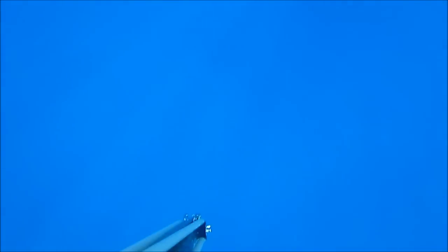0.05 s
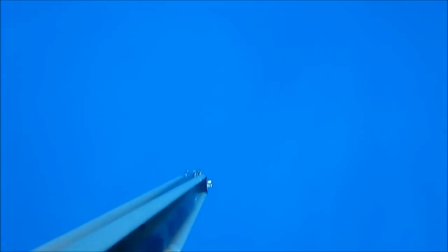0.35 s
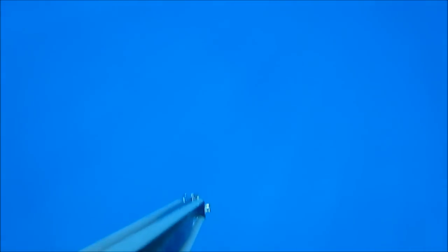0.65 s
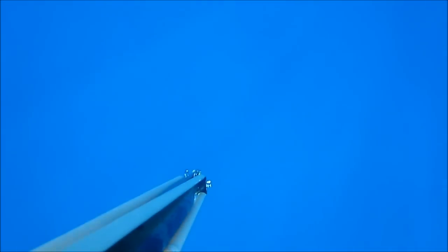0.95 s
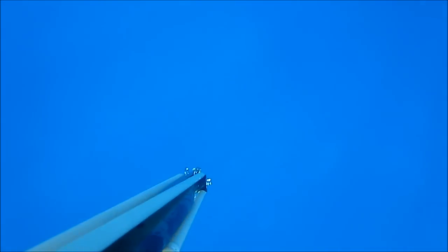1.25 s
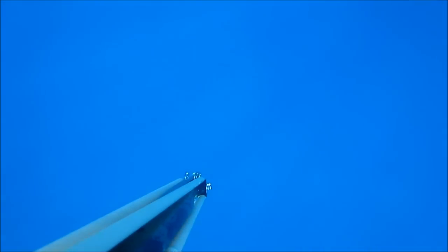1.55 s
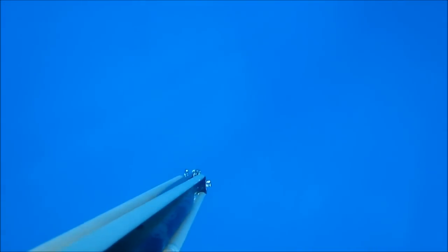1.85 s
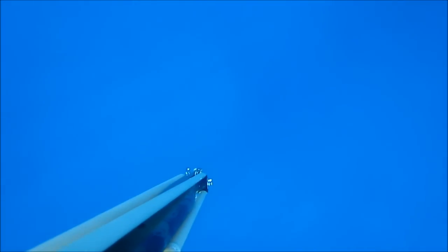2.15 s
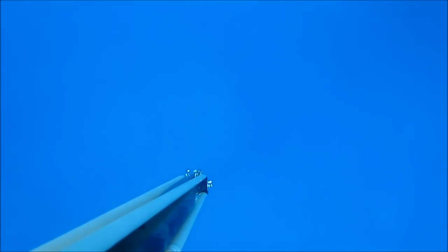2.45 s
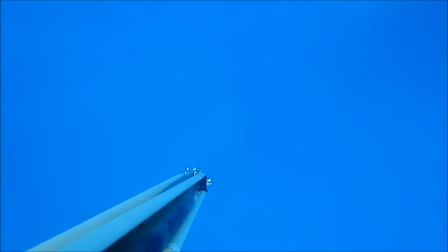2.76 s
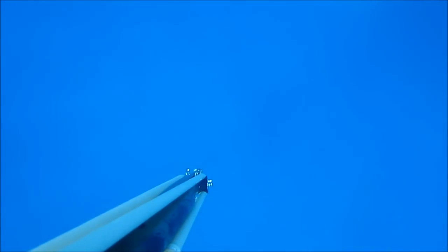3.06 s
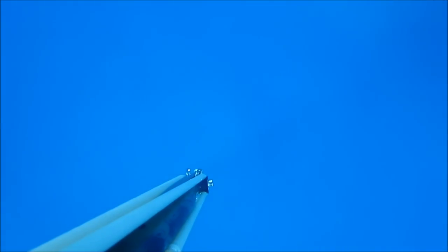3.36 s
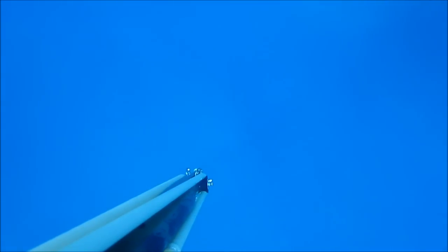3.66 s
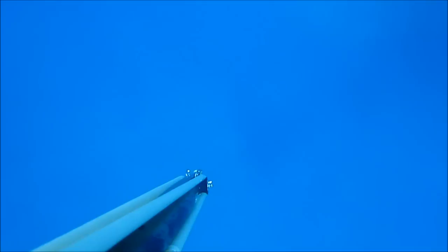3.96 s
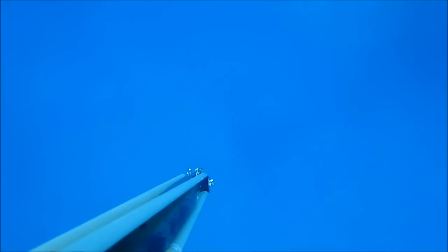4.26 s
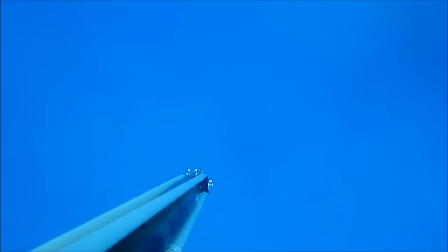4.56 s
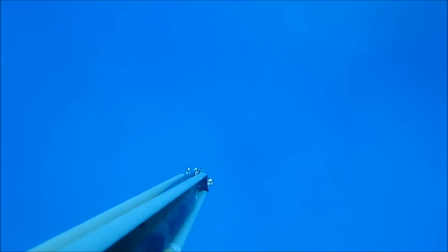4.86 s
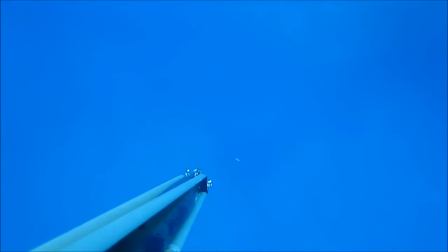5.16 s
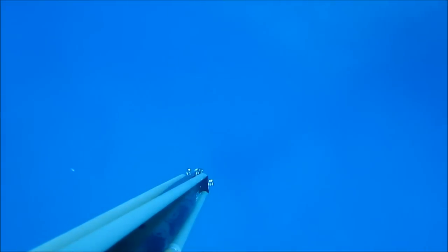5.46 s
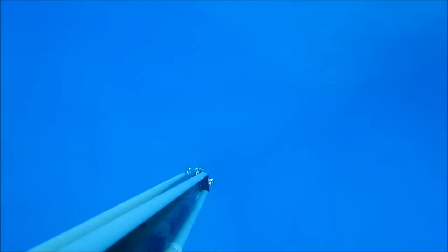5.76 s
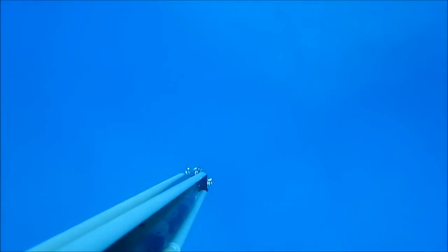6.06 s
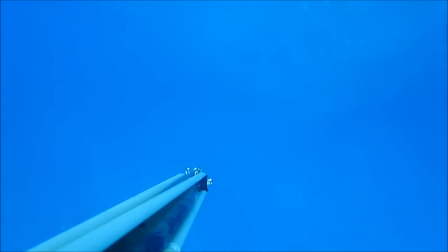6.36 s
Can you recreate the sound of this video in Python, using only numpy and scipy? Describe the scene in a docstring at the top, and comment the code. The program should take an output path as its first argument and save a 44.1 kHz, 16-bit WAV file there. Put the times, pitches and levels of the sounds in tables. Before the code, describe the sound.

A quick rattle of hard, briefly ringing clacks opens this underwater sound, picked up from inside a camera housing. Short gurgles of air follow, then a few soft, dull thuds from handling the pole. What remains is quiet sea ambience that runs all along: irregular bright shrimp snaps, fine distant crackle, muffled sloshing, an even hiss and the faint high whine of the camera's electronics.

```python
"""A camera in a waterproof housing is held under the sea on a pole.
First, gear knocks on the housing and makes it ring, and pockets of air gurgle as it is moved into place.
From about one second, the grip bumps softly on the pole while the rumble of the water settles.
What remains was there all along: shrimp snapping as their bubbles collapse, heard through the housing,
a muffled wash of water, a steady hiss and the thin whine of the camera's electronics."""
import sys
import numpy as np
from scipy import signal
from scipy.fft import rfft, irfft
from scipy.io import wavfile

SR = 44100
rng = np.random.default_rng(int(sys.argv[2]) if len(sys.argv) > 2 else 0)


def store_pcm(level_fs):
    """Save levels as 16-bit WAV."""
    pcm = np.round(np.clip(level_fs, -1, 1) * 32767).astype(np.int16)
    wavfile.write(sys.argv[1], SR, np.atleast_2d(pcm).T)


N = 286650
TIME = np.arange(N) / SR

# Gear knocking on the housing. Each row: start in seconds, clack level in dB, clack pitch in Hz,
# ring time in seconds (the time to fade by 60 dB), body level in dB, tick level in dB, tick pitch in Hz.
GEAR_KNOCKS = [(0.016, -6.5, 2010, 0.006, -3.5, -32, 4500), (0.0260, -10.5, 2790, 0.026, -16.5, -24, 9000),
               (0.0274, -4, 1930, 0.012, -10, -36, 4500), (0.0372, -11.5, 1940, 0.0076, -34, -39, 4480),
               (0.116, -27, 3380, .014, -28, -29, 6000), (0.1197, -20.5, 2790, .018, -30, -23, 4200),
               (0.1297, -3, 2620, 0.0036, -19, -18.5, 7820), (0.148, -15, 2770, 0.017, -43, -21, 5600),
               (0.1639, -18.5, 4810, 0.016, -19, -19.5, 5550), (0.1665, -13, 3050, 0.008, -28, -32, 3870),
               (0.1731, -0.5, 3180, 0.0059, -9, -29, 9500), (0.2140, -23.5, 3270, .015, -37, -22.5, 5300),
               (0.6095, -15, 2830, .003, -20.5, -22, 4370), (0.6910, -29, 3000, 0.012, -48, -27, 3760)]
# Notes of the housing's hollow body. Each row: pitch in Hz, relative level in dB, ring time in seconds.
BODY_NOTES = [(592, -2.5, 0.038), (800, 20.5, 0.014), (913, 4, 0.029), (1440, 11.5, 0.017)]
# Notes of its stiff walls. Each row: pitch in Hz, relative level in dB, ring time in seconds.
WALL_NOTES = [(2720, -5, 0.016), (3433, 2.5, 0.011), (4254, -4.5, 0.012), (4664, -6.5, 0.013),
              (4980, -6.5, 0.017), (6000, -10.5, 0.017), (7430, -4.5, 0.0057), (7500, -6, .007),
              (8970, -1, 0.0093), (10200, -5, 0.0032), (11600, -0.5, 0.0041), (13200, -25, .003),
              (14400, -33, .003)]
# Gurgling pockets of air. Each row: start in seconds, length in seconds, pitch in Hz, slide in octaves,
# level of the main note in dB, level of the upper note in dB.
AIR_POCKETS = [(0.098, 0.057, 525, 0.19, -24, -50), (0.252, 0.049, 96, 0, -35, -52),
               (0.404, 0.02, 500, -0.33, -25, -38), (0.489, 0.06, 380.6, -.1, -28, -25.5),
               (0.509, 0.13, 310.6, -0.19, -30, -37), (0.502, 0.12, 67, .2, -38, -52),
               (0.636, 0.15, 80, -0.055, -32.5, -63), (0.857, 0.074, 105, 0.067, -35, -40),
               (0.93, 0.097, 131, 0.39, -24.5, -27), (1.043, 0.016, 560, 0.056, -21.5, -38),
               (1.352, 0.076, 381, 0.07, -30.5, -28.5), (4.250, 0.024, 135, -.1, -36, -49)]
# Bumps of the grip on the pole. Each row: start in seconds, peak level in dB.
GRIP_BUMPS = [(0.937, -21.5), (0.956, -33), (1.043, -19), (1.386, -31), (1.737, -19), (1.815, -27),
              (2.158, -32), (2.509, -30), (2.597, -23), (3.181, -30.5), (3.316, -32)]
# Snaps of the closest shrimp. Each row: start in seconds, peak level in dB, centre pitch in Hz.
CLOSE_SNAPS = [(0.487, -28.5, 9000), (1.113, -37, 4730), (1.462, -30.5, 4980), (1.6427, -34, 4840),
               (1.8387, -31, 4180), (2.3745, -32, 4300), (2.718, -29, 7700), (3.113, -27.5, 4850),
               (3.4865, -30, 4750), (3.6122, -26.5, 4180), (4.1694, -33, 4170), (4.3251, -32.5, 4800),
               (4.5236, -32, 4290), (5.0148, -29.5, 4230), (5.0713, -26, 4350), (5.2525, -28.5, 5960),
               (5.279, -27, 4270), (5.664, -27, 6040), (5.8824, -35, 5010), (6.2143, -29, 4170),
               (6.3842, -28, 4380), (6.484, -24, 5750)]
# The tone colour of four noises. Each row: frequency in Hz, relative level in dB.
RUMBLE_SPECTRUM = [(10, -1), (25, -7.5), (60, -2), (130, -6.5), (220, -6), (350, -4)]
SLOSH_SPECTRUM = [(150, -42), (250, -9), (350, 0.5), (450, 3.5), (520, 1.5), (700, -17.5)]
SPLASH_SPECTRUM = [(450, -2.5), (620, 4), (740, 1), (820, -0.5), (910, 2.5), (1050, -5.5), (1350, -17),
                   (2000, -4.5)]
HISS_SPECTRUM = [(500, -24), (1200, 4.5), (1380, 2.5), (1850, 6), (2300, 1.5), (3100, -0.5), (5400, -3),
                 (6500, -8.5), (8200, -6.5), (9000, -1.5), (10200, -5.5), (10700, -17), (13200, -11),
                 (15700, -16)]
# How the low sloshing, the lighter splashing and the housing's hollow note rise and fall.
# Each row: time in seconds, relative level in dB.
SLOSH_CURVE = [(0.2, -44.5), (0.85, -40), (1.41, -44), (2.52, -40), (3.65, -44), (4.18, -42.5),
               (4.45, -46.5), (5.41, -48), (6.32, -44.5), (6.5, -47)]
SPLASH_CURVE = [(0.2, -44), (0.79, -45.5), (2.1, -49), (2.55, -47.5), (3.48, -47), (4.23, -49.5),
                (4.67, -48.5), (4.94, -50), (5.69, -50.5), (6.5, -51)]
HOLLOW_CURVE = [(1.45, -44.5), (2.35, -44.5), (3.04, -52), (3.45, -47), (4.07, -48), (4.39, -45.5),
                (5.58, -44), (6.5, -47.5)]
# Tones of the electronics. Each row: pitch in Hz, average (rms) level in dB.
WHINE_TONES = [(1591.7, -64.5), (1878.7, -46), (2165.8, -57), (2740, -61.5), (3534.6, -61.5), (4763, -62.5),
               (5557.8, -64.5), (7580, -69), (7867, -80), (8442, -89), (8729, -77), (9028, -89),
               (9316, -89), (9603, -77), (9889.4, -66.5), (10176.5, -66.5), (11259, -81), (11546, -84),
               (14133, -87), (14420, -79), (14707, -79)]


def gear_knocks():
    """Each knock clacks at its own pitch, rings the hollow body and adds a short, high tick."""
    out = np.zeros(N)
    for start, clack_db, hz, ring_s, body_db, tick_db, tick_hz in GEAR_KNOCKS:
        blow = impulse(scatter=0.73, spread_s=0.003)
        clack = cut(ring(blow, hz, ring_s), 1.24 * hz, "low", order=6)
        clack = cut(clack, 0.62 * hz, "high")
        body = sum(from_db(db) * ring(blow, note_hz, fade_s) for note_hz, db, fade_s in BODY_NOTES)
        body = cut(body, 2070, "low", order=4)
        tick = cut(ring(blow, tick_hz, ring_s=0.0042), 2.3 * tick_hz, "low")
        add(out, start, at_peak(clack, clack_db) + at_peak(body, body_db) + at_peak(tick, tick_db))
    return out


def gurgles(wobble=0.041, roughness=0.35):
    """An air pocket swells, slides in pitch as it changes size, and fades; an upper note rings along."""
    out, unrest, flutter = np.zeros(N), drift(42), drift(86)
    for start, length, pitch_hz, slide, main_db, upper_db in AIR_POCKETS:
        age = np.linspace(0, 1, int(length * SR))
        here = slice(int(start * SR), int(start * SR) + len(age))
        swell = np.sin(np.pi * age ** 0.59) * (1 + roughness * flutter[here])
        main_hz = pitch_hz * 2 ** (slide * (age - .5))
        upper_hz = 1.28 * pitch_hz + 66.8
        for hz, db in ((main_hz, main_db), (upper_hz, upper_db)):
            phase = 2 * np.pi * np.cumsum(hz * (1 + wobble * unrest[here])) / SR
            add(out, start, from_db(db) * swell * np.sin(phase))
    return out


def grip_bumps():
    """A soft push on the pole gives one low thud and a short hollow ring."""
    out = np.zeros(N)
    for start, db in GRIP_BUMPS:
        push = impulse(scatter=0.3, spread_s=0.011)
        thud = ring(push, 39, 0.062) + 0.51 * ring(push, 89, 0.019) + ring(push, 490, 0.02)
        add(out, start, at_peak(cut(thud, 850, "low"), db))
    return out


def shrimp_snaps(width_octaves=0.22, through_gain=0.51):
    """A close shrimp's bubble collapses; the pop passes through the walls and makes them ring."""
    out = np.zeros(N)
    for start, db, centre_hz in list(CLOSE_SNAPS) + neighbour_snaps():
        pop = impulse(scatter=2.0, spread_s=0.0024)   # smeared by echoes off seabed and surface
        walls = np.zeros(len(pop))
        for hz, note_db, ring_s in WALL_NOTES:
            closeness = np.exp(-.5 * (np.log2(hz / centre_hz) / width_octaves) ** 2)
            walls += from_db(note_db) * closeness * ring(pop, hz, ring_s)
        through = cut(pop, 0.49 * centre_hz, "high", order=4)
        through = cut(through, 1.4 * centre_hz, "low", order=3)
        add(out, start, at_peak(rms_one(walls) + through_gain * rms_one(through), db))
    return out


def neighbour_snaps(per_s=2.5, level_db=-32.5, spread_db=2, low_hz=4640, high_hz=8800):
    """Weaker neighbours snap at random; gives rows like those of CLOSE_SNAPS."""
    draws = rng.random((int(per_s * N / SR), 3))
    return [(when * N / SR, level_db + spread_db * (1 - 2 * softness), low_hz * (high_hz / low_hz) ** up)
            for when, softness, up in draws]


def far_shrimp_crackle(per_s=600, size_db=4.0, level_db=-52):
    """Many small, far snaps, some dull and some bright, keep the walls ringing."""
    chance = per_s * from_db(2.5 * drift(8)) / SR
    moments = np.flatnonzero(rng.random(N) < chance)
    sizes = from_db(size_db * np.minimum(rng.exponential(1, len(moments)), 3.5))
    tilt_db_per_octave = 1.5 * rng.uniform(-1.6, 1, len(moments))
    out = np.zeros(N)
    for hz, db, ring_s in WALL_NOTES:
        clicks = np.zeros(N)
        clicks[moments] = sizes * from_db(tilt_db_per_octave * np.log2(hz / 6000))
        smeared = smear(clicks, fade_s=0.0005)   # the sound takes many paths through the water
        out += from_db(db) * ring(smeared, hz, ring_s)
    return from_db(level_db) * rms_one(out)


def tiny_shrimp_fizz(per_s=45, size_db=6.5, level_db=-62, pitches=6):
    """The smallest shrimp add thin, dry ticks, each at one of a few very high pitches."""
    moments = rng.random(N) < per_s / SR
    clicks = moments * from_db(size_db * np.minimum(rng.exponential(1, N), 2.5))
    choice, out = rng.integers(0, pitches, N), np.zeros(N)
    for k, hz in enumerate(np.geomspace(7500, 14000, pitches)):
        out += ring(smear(clicks * (choice == k), fade_s=0.00081), hz, ring_s=0.0019)
    return from_db(level_db) * rms_one(out)


def water_wash(stir_db=6.5, settle_s=1.27):
    """Moving water rumbles, bubbles, sloshes and splashes; the rumble settles as the pole comes to rest."""
    settling = from_db(-51.5 + stir_db * np.exp(-TIME / settle_s))
    rumble = settling * coloured_noise(RUMBLE_SPECTRUM) * from_db(1.9 * drift(4.1))
    bubbling = from_db(-2) * cut(small_bubbles(), 600, "low")
    slosh = follow(SLOSH_CURVE, boost_db=0.16) * surface_echo(coloured_noise(SLOSH_SPECTRUM) + bubbling)
    splash = follow(SPLASH_CURVE, boost_db=2.5) * surface_echo(coloured_noise(SPLASH_SPECTRUM))
    return rumble + slosh + splash


def small_bubbles(low_hz=323, high_hz=505, per_s=130, cycles=17.4, sizes=14):
    """Bubbles ring briefly at random moments, each size at its own pitch."""
    clicks = (rng.random(N) < per_s / SR) * rng.standard_normal(N)
    choice = rng.integers(0, sizes, N)
    pitches = np.geomspace(low_hz, high_hz, sizes)
    return rms_one(sum(ring(clicks * (choice == k), hz, cycles / hz) for k, hz in enumerate(pitches)))


def surface_echo(x, strength=0.22, first_lag_s=0.000898, growth_per_s=0.2156):
    """The surface mirrors sound upside down; as the echo lags more, the pitches it weakens slide down."""
    lag = first_lag_s * np.exp(growth_per_s * TIME)
    return rms_one(x - strength * np.interp(TIME - lag, TIME, x))


def hollow_note(throb_db=-0.5):
    """Air in the housing rings at two close pitches that beat together, and throbs with the water."""
    lower = rms_one(ring(rng.standard_normal(N), hz=564.6, ring_s=0.16))
    upper = rms_one(ring(rng.standard_normal(N), hz=585.0, ring_s=0.14))
    air = cut(lower + from_db(-5) * upper, 1460, "low")
    return follow(HOLLOW_CURVE, boost_db=3) * rms_one(air * from_db(throb_db * drift(30)))


def electronics_whine(frames_per_s=29.97, sharpness=2.76):
    """Electronic tones flip upside down once in every picture frame, which gives them a fine flutter."""
    flip = rms_one(np.tanh(sharpness * np.sin(np.pi * (frames_per_s * TIME - 0.742))))
    tones = sum(from_db(db) * np.sin(2 * np.pi * (hz * TIME + rng.random())) for hz, db in WHINE_TONES)
    return np.sqrt(2) * tones * flip


def from_db(db):
    """Turn decibels into a number to multiply by."""
    return 10 ** (np.asarray(db) / 20)


def rms_one(x):
    """Scale a sound to an average (rms) level of 1."""
    return x / np.sqrt(np.mean(x ** 2) + 1e-20)


def at_peak(x, db):
    """Scale a sound so that its peak is at the given level."""
    return from_db(db) * x / (np.abs(x).max() + 1e-20)


def follow(curve, boost_db):
    """A volume that follows a level curve, raised by the boost."""
    return from_db(np.interp(TIME, *np.transpose(curve)) + boost_db)


def add(out, start_s, sound):
    """Mix a sound in at the given time."""
    at = int(np.clip(round(start_s * SR), 0, N - 1))
    out[at:at + len(sound)] += sound[:N - at]


def cut(x, hz, keep, order=2):
    """Keep the "low" or the "high" side of a frequency; a higher order cuts more steeply."""
    return signal.sosfilt(signal.butter(order, min(hz, .45 * SR), keep, fs=SR, output="sos"), x)


def ring(x, hz, ring_s):
    """Every click in x starts a tone that fades by 60 dB in ring_s seconds."""
    decay, step = from_db(-60 / (ring_s * SR)), 2 * np.pi * hz / SR
    return signal.lfilter([.5, 0, -.5], [1, -2 * decay * np.cos(step), decay * decay], x + 1e-18)


def impulse(scatter, spread_s):
    """A click followed by a quickly dying scatter of echoes."""
    t = TIME[:SR // 12]
    tail = rng.standard_normal(len(t)) * np.exp(-t / spread_s)
    return (t == 0) + scatter * tail / np.linalg.norm(tail)


def smear(clicks, fade_s):
    """Turn each click into a short, fading puff of noise."""
    fades = signal.lfilter([1], [1, -np.exp(-1 / (fade_s * SR))], clicks + 1e-18)
    return fades * rng.standard_normal(N)


def coloured_noise(spectrum):
    """Noise with the given tone colour, at an average level of 1."""
    hz, level_db = np.transpose(spectrum)
    bins = np.maximum(np.fft.rfftfreq(N, 1 / SR), 1)
    gain = from_db(np.interp(np.log(bins), np.log(hz), level_db, left=-90, right=-90))
    return rms_one(irfft(rfft(rng.standard_normal(N)) * gain, N))


def drift(rate_hz):
    """A random wander of typical size 1, mostly slower than rate_hz."""
    bins = np.fft.rfftfreq(N, 1 / SR)
    return rms_one(irfft(rfft(rng.standard_normal(N)) / (1 + (bins / rate_hz) ** 2), N))


def scene():
    """Everything reaches one microphone inside the housing, over a steady hiss."""
    hiss = from_db(-47.5) * coloured_noise(HISS_SPECTRUM)
    handling = gear_knocks() + gurgles() + grip_bumps()
    shrimp = shrimp_snaps() + far_shrimp_crackle() + tiny_shrimp_fizz()
    return (handling + shrimp + water_wash() + hollow_note() + electronics_whine() + hiss)[None]


def record(dry, cutoff_hz=15800):
    """Flatten any peak beyond full scale, then cut away the highest treble."""
    treble_cut = signal.ellip(12, .1, 70, cutoff_hz, fs=SR, output="sos")
    return signal.sosfilt(treble_cut, np.clip(dry, -1, 1))


dry = scene()
out = record(dry)
store_pcm(out)
```